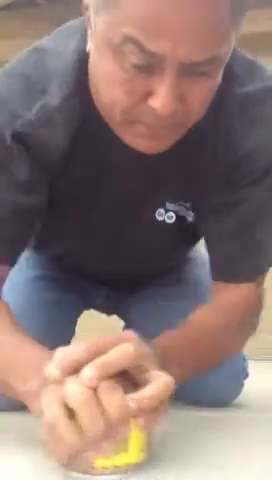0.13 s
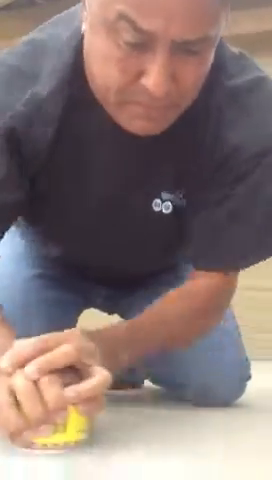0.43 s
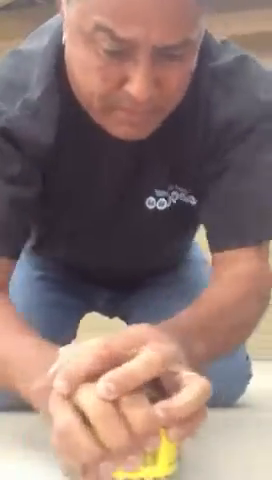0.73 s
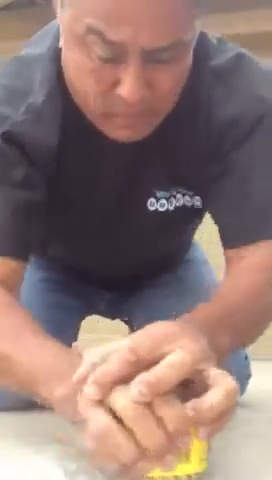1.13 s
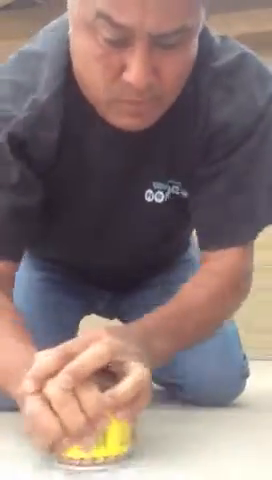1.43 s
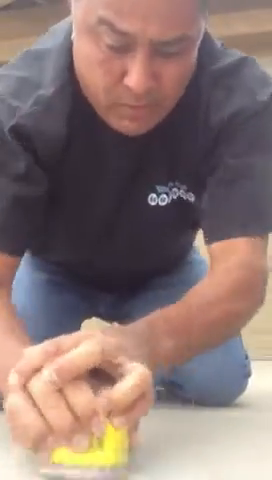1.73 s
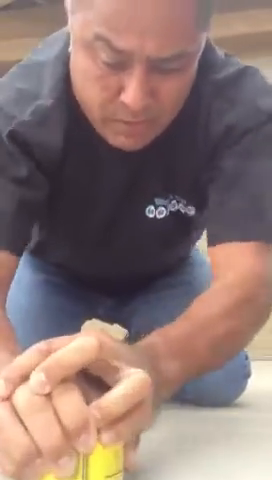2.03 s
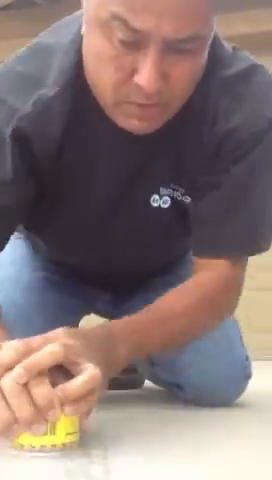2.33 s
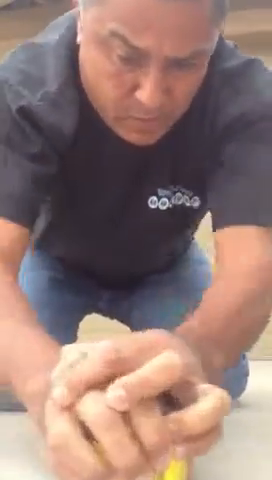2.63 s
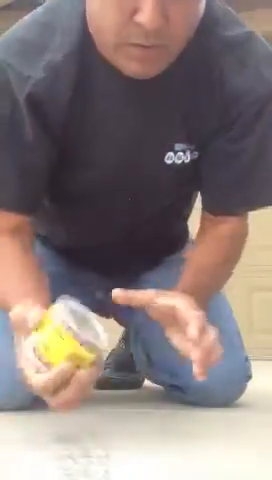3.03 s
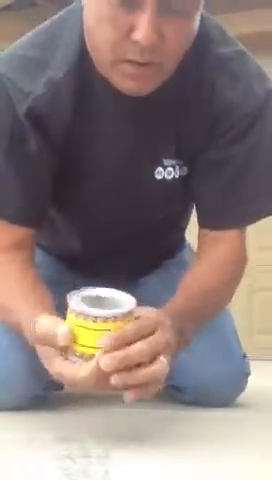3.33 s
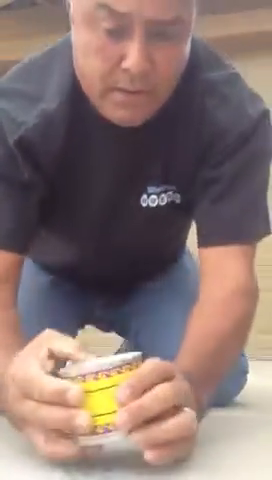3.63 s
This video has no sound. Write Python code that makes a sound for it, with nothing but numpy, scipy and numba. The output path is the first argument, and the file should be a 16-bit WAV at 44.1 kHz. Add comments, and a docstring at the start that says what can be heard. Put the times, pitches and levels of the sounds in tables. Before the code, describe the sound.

A small metal can grinds against a concrete driveway in quick back-and-forth strokes, gritty and ringing, with occasional knocks. It then lifts off, leaving faint handling and a low outdoor rumble. The scraping sounds close.

```python
"""Can scrubbed on concrete

A small metal food can, upside down under both hands, is scrubbed to and fro on a driveway.
Sand grains catch its rim and ring the lid, the wall and the hollow under it; it judders and at times
knocks. Then it is lifted and turned in the hands, over a faint outdoor rumble."""
import sys
import numpy as np
from scipy import signal
from scipy.fft import rfft, irfft
from scipy.io import wavfile
from scipy.ndimage import uniform_filter1d
from numba import njit

SR = 44100
rng = np.random.default_rng(int(sys.argv[2]) if len(sys.argv) > 2 else 0)


def wav_record(signal):
    """Record a signal, one row per channel, as 16-bit PCM in the file named by sys.argv[1]."""
    frames = np.transpose(np.atleast_2d(signal))
    bounded = np.clip(frames, -1, 1)
    # unit amplitude maps onto the largest positive 16-bit level
    quanta = np.round(bounded * 32767).astype(np.int16)
    wavfile.write(sys.argv[1], SR, quanta)


N = 167580


def undb(db):
    return 10 ** (np.asarray(db) / 20)


def unit(x):
    return x / np.sqrt(np.mean(x ** 2))


def fade_60db(age_s, t60_s):
    return np.exp(-np.log(1000) * age_s / t60_s)


def walk(rate_hz):
    """Smooth random drift, RMS 1."""
    hold = int(SR / rate_hz)
    steps = np.repeat(rng.standard_normal(N // hold + 1), hold)
    return unit(uniform_filter1d(steps, hold)[:N])


@njit
def bandpass(x, hz, width_hz):
    """State-variable band-pass, moving centre, peak gain 1."""
    y, band, low = np.empty(len(x)), 0., 0.
    for i in range(len(x)):
        g, damping = np.tan(np.pi * hz[i] / SR), width_hz / hz[i]
        v = (band + g * (x[i] + 1e-18 - low)) / (1 + g * (g + damping))
        band, low = 2 * v - band, low + 2 * g * v
        y[i] = damping * v
    return y


def ring(x, hz, width_hz, skirt):
    """Resonance scaled for white input; a second band-pass, skirt times wider, steepens its sides."""
    hz = hz * np.ones(N)
    peak = bandpass(x, hz, float(width_hz))
    return bandpass(peak, hz, float(width_hz * skirt)) * np.sqrt(SR / np.pi / width_hz)


def colour(x, points, size=2048):
    """Minimum-phase filter through (Hz, dB) points; keeps the level of white input."""
    hz, db = np.array(points, float).T
    log_hz = np.log(np.fft.rfftfreq(size, 1 / SR) + 1)
    gain = undb(np.interp(log_hz, np.log(hz), db))
    cepstrum = irfft(np.log(gain))
    cepstrum[1:size // 2] *= 2
    cepstrum[size // 2 + 1:] = 0
    impulse = irfft(np.exp(rfft(cepstrum)))
    return signal.fftconvolve(x, impulse / np.linalg.norm(impulse))[:N]


def struck(age_s, modes, tuning):
    """Decaying sines; tuning multiplies each mode's frequency."""
    return sum(undb(db) * np.sin(2 * np.pi * tuning * freq * age_s) * fade_60db(age_s, t60_s)
               for freq, db, t60_s in modes)


def grains(per_s=5000, spread_db=3.5, dust_gain=0.92):
    """Force of sand grains catching: many small, a few large, over fine dust."""
    size = undb(spread_db * np.minimum(rng.exponential(size=N), 5))
    hits = (rng.random(N) < per_s / SR) * size * np.sign(rng.standard_normal(N))
    return unit(unit(hits) + dust_gain * rng.standard_normal(N))


def scraping(t):
    """Strokes drive grains into the rim and retune the can. Returns body, rasp force, wall pitch."""
    # Each row: start, end, rise and fall in seconds; rasp drive and its drop over the stroke in dB;
    # wall, lid and hollow drive in dB; nominal lid pitch, wall pitch at start and at end, and
    # mid-stroke hollow pitch in Hz; the hollow's fractional rise at the turns.
    strokes = [ (-.15, .062, .04, 0.087, -32, 0, -25.5, -30, -39, 1030, 1240, 1447, 470, 0.61),
               (0.079, 0.307, 0.026, 0.14, -26.5, -10.5, -29, -32, -34, 1055, 1310, 1492, 484, 0.56),
               (0.326, 0.537, 0.026, 0.046, -38.5, 12, -31.5, -45, -45, 1018, 1165, 1568, 441, 0.86),
               (0.539, 0.745, 0.047, 0.06, -30, -4.5, -30.5, -31.5, -34, 1066, 1293, 1533, 516, 0.7),
               (0.758, 0.968, .025, 0.072, -36.5, -10.5, -31.5, -37.5, -44, 988, 1265, 1485, 414, 0.45),
               (0.986, 1.185, 0.03, 0.084, -32, -3.5, -31.5, -30, -34, 1066, 1385, 1540, 582, 0.61),
               (1.219, 1.419, 0.018, .015, -46, 12, -40, -39.5, -44, 1043, 1413, 1297, 406, 0.1),
               (1.45, 1.676, 0.014, 0.047, -37.5, -3, -39.5, -40.5, -40, 1050, 1466, 1538, 812, 0.17),
               (1.713, 1.911, 0.3, 0.018, -38.5, -12, -27.5, -33.5, -32, 978, 1184, 1360, 313, 0.21),
               (1.928, 2.166, 0.034, 0.058, -38.5, -8.5, -41.5, -40, -41.5, 925, 1383, 1427, 543, 0.066),
               (2.216, 2.503, .02, 0.12, -37.5, 4, -30.5, -40.5, -45.5, 937, 1352, 1334, 350, 0.075),
               (2.486, 2.72, 0.071, 0.053, -31, -6.5, -26.5, -33, -47, 1023, 1400, 1430, 447, 0.03),
               (2.73, 2.998, 0.032, 0.066, -39, -0.5, -32, -44.5, -49.5, 970, 1344, 1262, 387, 0.11), ]
    # Spectrum of the gripped can. Each row: frequency in Hz, relative level in dB.
    grip_spectrum = [(30, -27), (60, -31.5), (110, -23), (190, 7), (300, 3), (500, 8), (1000, -32),
                     (4000, -64.5)]
    judder_hz, judder_db, grip_db = 55.74, 3, -50
    breakaway = 0.21  # share of full speed at which a stroke jerks loose
    judder_cycles = np.cumsum(judder_hz * (1 + .25 * walk(40))) / SR
    judder = np.sqrt(2) * np.sin(2 * np.pi * judder_cycles)
    patches_db, force = walk(130), grains()
    drive, pitch_hz = np.zeros((5, N)), np.full((3, N), 1000.)
    wall_hz, lid_hz, hollow_hz = pitch_hz
    for (start_s, end_s, rise_s, fall_s, rasp_db, drop_db, wall_db, lid_db, hollow_db,
         lid0_hz, wall0_hz, wall1_hz, hollow0_hz, opening) in strokes:
        progress = np.clip((t - start_s) / (end_s - start_s), 0, 1)
        started = t >= start_s
        push = breakaway + (1 - breakaway) * np.clip((t - start_s) / rise_s, 0, 1) ** 2.34
        speed = started * push * np.clip((end_s - t) / fall_s, 0, 1) ** 1.3
        body_drive = speed * undb(patches_db + judder_db * judder)
        drive[0] += speed * undb(rasp_db + patches_db - drop_db * (progress - .5))
        drive[1:] += undb([wall_db, lid_db, hollow_db, grip_db])[:, None] * body_drive
        tilt = (2 * progress[started] - 1) ** 2  # the can tips at the turns and opens the hollow
        wall_hz[started] = wall0_hz + (wall1_hz - wall0_hz) * progress[started]
        lid_hz[started] = lid0_hz * (1 - 0.081 * (tilt - .2))
        hollow_hz[started] = hollow0_hz * (1 + opening * tilt)
    rasp, wall_force, lid_force, hollow_force, grip_force = drive * force
    # Each row: ratio to wall pitch, width in Hz, relative level in dB.
    wall_modes = [(0.922, 70.9, -9.5), (1, 62.1, -2), (1.082, 75, -9.5)]
    wall = sum(undb(db) * ring(wall_force, ratio * wall_hz, width_hz, skirt=13.4)
               for ratio, width_hz, db in wall_modes) / np.sqrt(2)
    lid = ring(lid_force, lid_hz, width_hz=59, skirt=15)
    hollow = ring(hollow_force, hollow_hz, width_hz=96, skirt=5.5)
    return wall + lid + hollow + colour(grip_force, grip_spectrum), rasp, wall_hz


def knocking(t, wall_hz, contact_s=.0008, low_cut_hz=224):
    """The rim skips and lands: short ring, crushed grit, at times a thud. Returns body, grit force."""
    # Each row: start in seconds, body level in dB, grit level in dB, grit decay in seconds.
    knocks = [ (.141, -12.5, -25, 0.0063), (.162, -14.5, -37, .003), (0.221, -38, -13.5, 0.019),
              (0.236, -43, -17.5, 0.0012), (0.244, -38.5, -21, 0.0021), (.397, -14.5, -38.5, .004),
              (.591, -21, -33, 0.011), (.686, -14, -22, 0.0067), (.778, -18.5, -37, 0.0035),
              (1.266, -25, -34, 0.0026), (1.304, -19.5, -30, 0.0032), (1.328, -32, -32, 0.0014),
              (1.352, -18, -23.5, 0.00041), (1.374, -20, -28.5, .005), (1.724, -15, -22.5, 0.0058),
              (1.741, -29.5, -33.5, 0.0016), (1.753, -16.5, -15.5, .0025), (1.78, -15.5, -9.5, 0.0023),
              (1.794, -21, -25, 0.0027), (1.807, -19, -15, 0.0059), (1.817, -25, -33, 0.0037),
              (1.842, -14, -10.5, 0.0014), (1.851, -21, -27, 0.003), (1.863, -18, -28, 0.014),
              (2.006, -21.5, -38, .003), (2.212, -32.5, -25.5, 0.002), (2.227, -7.5, -20, 0.0081),
              (2.234, -17.5, -19, 0.0042), (2.253, -9.5, -25, .005), (2.26, -35, -17, 0.0045),
              (2.285, -22, -27.5, 0.0088), (2.3125, -11, -22.5, 0.0017), (2.317, -9, -23, 0.0069),
              (2.3496, -13, -35.5, 0.0017), (2.548, -17, -39.5, 0.0013), (2.593, -9, -21, 0.0046),
              (2.611, -17, -27.5, .0036), ]
    # Each row: ratio to wall pitch, relative level in dB, T60 in seconds.
    knock_modes = [(.77, -22, .03), (.93, 0.5, 0.017), (1.07, -4, 0.029)]
    # Thuds of the whole can. Each row: start in seconds, level in dB.
    thuds = [(0.777, -26.5), (1.33, -24), (1.375, -27.5), (1.842, -16), (2.316, -28)]
    # Each row: frequency in Hz before tuning, relative level in dB, T60 in seconds.
    thud_modes = [(322, -2, 0.022), (416, -6, 0.02)]
    body, burst = np.zeros(N), np.zeros(N)
    age_s = t[:SR // 8]
    onset = 1 - np.exp(-age_s / contact_s)
    for start_s, body_db, grit_db, decay_s in knocks:
        span = int(start_s * SR) + np.arange(len(age_s))
        body[span] += undb(body_db) * struck(age_s, knock_modes, wall_hz[span[0]]) * onset
        grit_onset = 1 - np.exp(-age_s / (0.31 * decay_s))
        burst[span] += undb(grit_db) * np.exp(-age_s / decay_s) * grit_onset
    for start_s, db in thuds:
        span = int(start_s * SR) + np.arange(len(age_s))
        body[span] += undb(db) * struck(age_s, thud_modes, tuning=0.95)
    low_cut = signal.butter(2, low_cut_hz, "high", fs=SR, output="sos")
    return signal.sosfilt(low_cut, body), burst * rng.standard_normal(N)


def grinding(t, rasp, grit, wall_hz):
    """Treble of the sand on the rim: broad rasp, sizzle, gliding overtones, thin shell rings."""
    # Both spectra, each row: frequency in Hz, relative level in dB.
    rasp_spectrum = [(100, -28.5), (250, -3.5), (800, 3), (1600, 10.5), (2100, 7), (2900, 7), (3700, 4),
                     (5900, 2.5), (9500, 8), (12000, -16.5), (16000, -12.5)]
    sizzle_spectrum = [(2000, -34.5), (7000, -17), (9800, -1), (11100, 5), (12200, 6.5), (13200, 2),
                       (14500, -13.5)]
    # Each row: time in seconds, sizzle drive against the rasp in dB.
    sizzle_levels = [(.45, 0.5), (1.05, 3), (1.7, -0.5)]
    # Each row: frequency in Hz, width in Hz, relative level in dB.
    shell_modes = [(3070, 60, -9), (4480, 170, -9), (5150, 110, -12), (7090, 40, -6), (7660, 200, -2),
                   (8390, 60, -7), (11000, 200, 0), (11570, 80, 2)]
    # Each row: ratio to wall pitch, level in dB.
    wall_overtones = [(2.1, -17), (2.35, -23.5)]
    force = rasp + undb(-3) * grit
    sizzle_db = np.interp(t, *np.array(sizzle_levels).T)
    sizzle_force = undb(sizzle_db) * rasp + undb(3) * grit
    shell = sum(undb(db) * ring(force, hz * (1 + .012 * walk(8.3)), width_hz, skirt=28)
                for hz, width_hz, db in shell_modes)
    overtones = sum(undb(db) * ring(force, ratio * wall_hz, width_hz=63, skirt=2.8)
                    for ratio, db in wall_overtones)
    hiss = colour(force, rasp_spectrum) + colour(sizzle_force, sizzle_spectrum)
    return shifting_contact(hiss) + undb(-24) * shell + overtones


def shifting_contact(x, spread_db=2.5, rate_hz=45):
    """The contact point moves round the rim: half-octave bands swell and sink independently."""
    hz = np.fft.rfftfreq(N, 1 / SR)
    half_octaves = 2 * np.log2(np.clip(hz, 1500, 12000) / 1500)
    spectrum = rfft(x)
    bands = (irfft(spectrum * np.maximum(1 - abs(half_octaves - k), 0), N) for k in range(7))
    return sum(band * undb(spread_db * (walk(rate_hz) - .25)) for band in bands)


def rim_bite(grit):
    """The rim rings under crushed grit."""
    return undb(-6.5) * ring(grit, hz=8200, width_hz=3740, skirt=3.2)


def lift(t, start_s=2.971, lid_hz=1040):
    """The lid rings freely as the rim leaves the ground."""
    age_s = np.maximum(t - start_s, 0)
    return undb(-31) * np.sin(2 * np.pi * lid_hz * age_s) * fade_60db(age_s, t60_s=.085)


def hand_bumps(t):
    """Soft bumps of the grip: low tone pulses."""
    # Each row: centre and length in seconds, pitch in Hz, level in dB.
    bumps = [(0.489, 0.026, 203.4, -33.5), (1.48, 0.021, 179, -42), (3.137, 0.067, 293, -53)]
    out = np.zeros(N)
    for centre_s, length_s, hz, db in bumps:
        pulse = np.exp(-(2 * (t - centre_s) / length_s) ** 2)
        out += undb(db) * pulse * np.sin(2 * np.pi * hz * t + 0.17 * walk(90))
    return out


def finger_slide(t, peak_s=3.26, rise_s=.04, fall_s=.09):
    """Fingers slide over the lifted can and ring it faintly."""
    # Each row: frequency in Hz, width in Hz, relative level in dB.
    slide_modes = [(1701, 40, -5), (4900, 300, -7), (11300, 2000, 0)]
    swell = np.exp(np.minimum((t - peak_s) / rise_s, (peak_s - t) / fall_s))
    friction = undb(-62) * swell * grains()
    return sum(undb(db) * ring(friction, hz, width_hz, skirt=29) for hz, width_hz, db in slide_modes)


def house_echo(x, t, level_db=-35, delay_s=0.0099, top_hz=3000):
    """Weak, dull echo from the house front."""
    tail = rng.standard_normal(N) * fade_60db(t, t60_s=0.67) * (t > delay_s)
    tail = signal.sosfilt(signal.butter(1, top_hz, fs=SR, output="sos"), tail)
    return undb(level_db) * signal.fftconvolve(x, tail / np.linalg.norm(tail))[:N]


def outdoor_rumble(level_db=-59):
    """Faint low noise, wavering in level."""
    # Each row: frequency in Hz, relative level in dB.
    rumble_spectrum = [(20, -60), (55, -27), (125, -3), (247, 1.5), (312, -4), (629, -13.5), (1000, -25.5),
                       (15000, -29)]
    return undb(level_db + walk(3.38)) * colour(rng.standard_normal(N), rumble_spectrum)


def scene():
    t = np.arange(N) / SR
    body, rasp, wall_hz = scraping(t)
    knocks, grit = knocking(t, wall_hz)
    treble = grinding(t, rasp, grit, wall_hz) + rim_bite(grit)
    can = body + knocks + treble + lift(t) + hand_bumps(t) + finger_slide(t)
    rumble = outdoor_rumble()
    return (can + house_echo(can, t) + rumble)[None]


def record(dry):
    """Steep low-pass."""
    top_hz = 15400
    return signal.sosfilt(signal.ellip(8, .2, 70, top_hz, fs=SR, output="sos"), dry)


dry = scene()
out = record(dry)
wav_record(out)
```